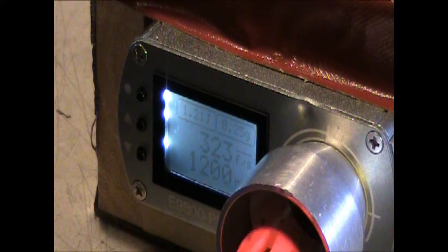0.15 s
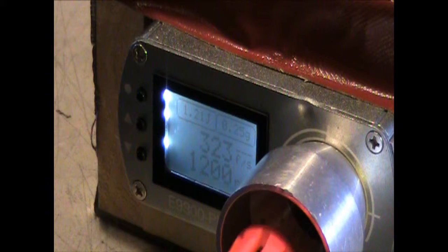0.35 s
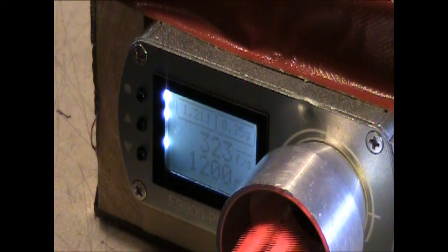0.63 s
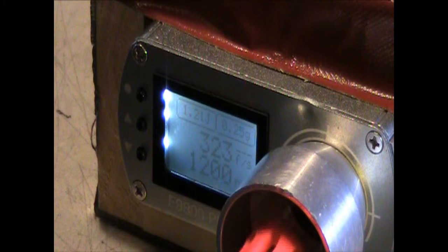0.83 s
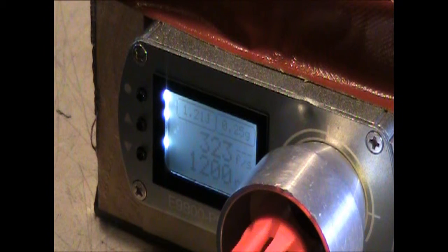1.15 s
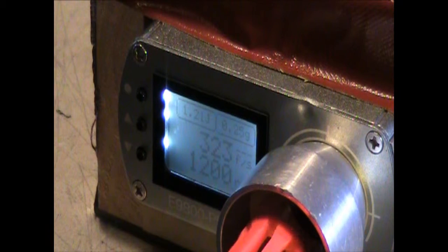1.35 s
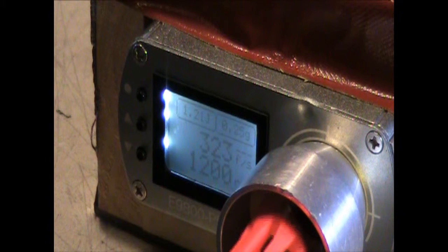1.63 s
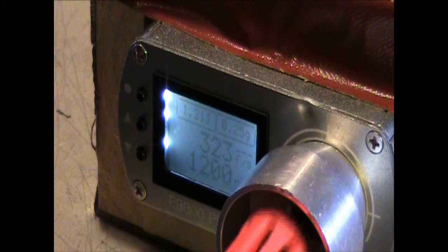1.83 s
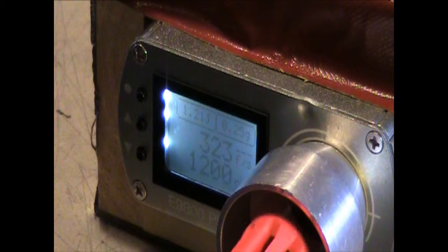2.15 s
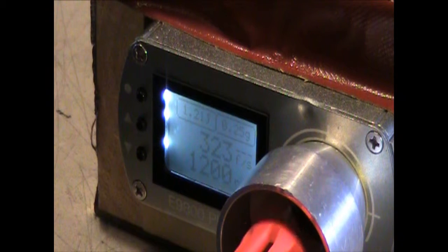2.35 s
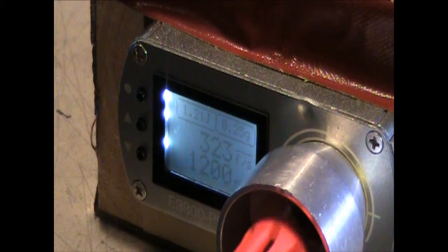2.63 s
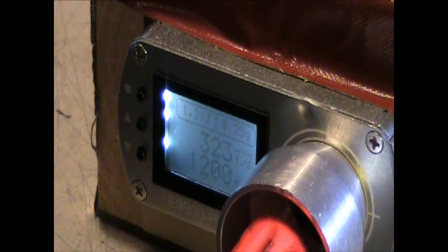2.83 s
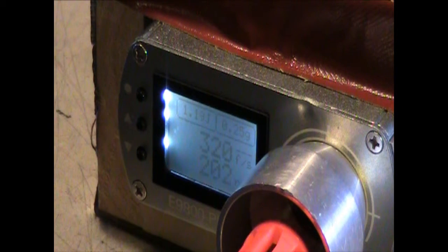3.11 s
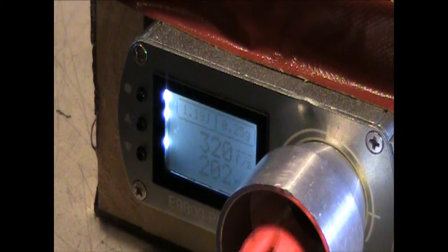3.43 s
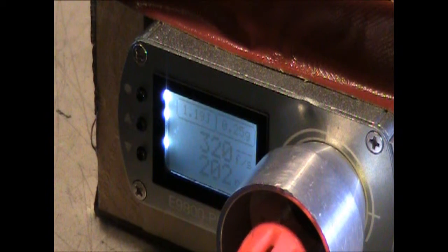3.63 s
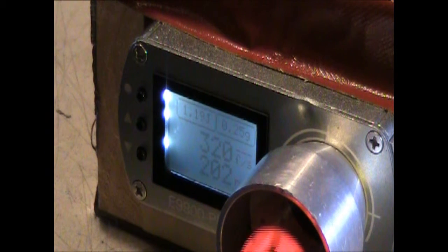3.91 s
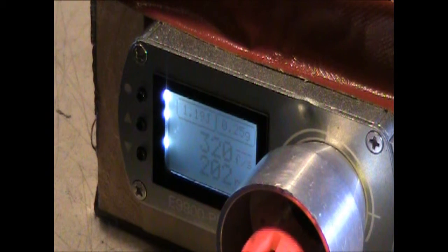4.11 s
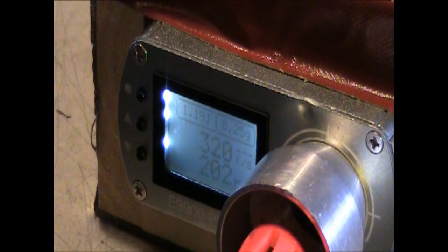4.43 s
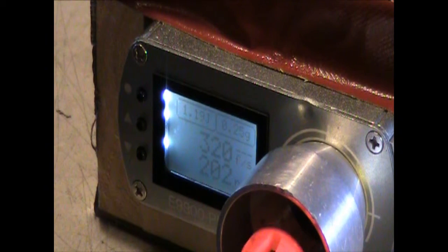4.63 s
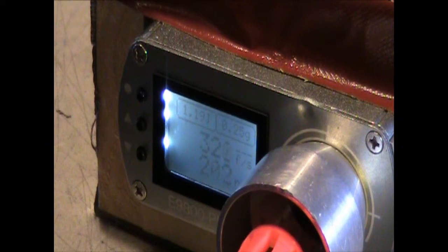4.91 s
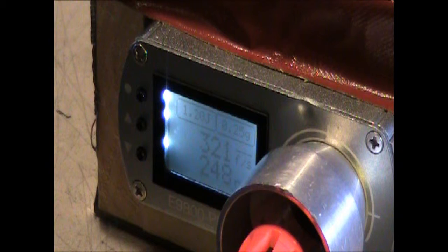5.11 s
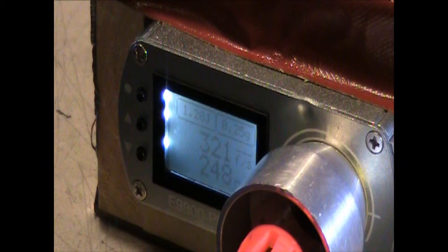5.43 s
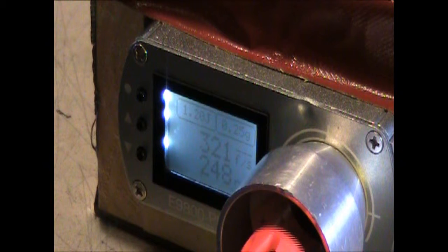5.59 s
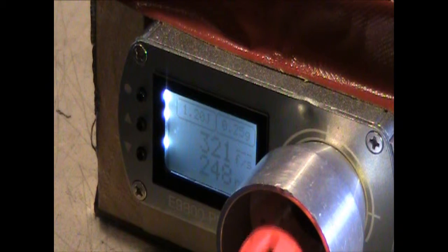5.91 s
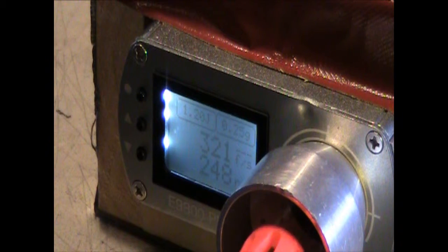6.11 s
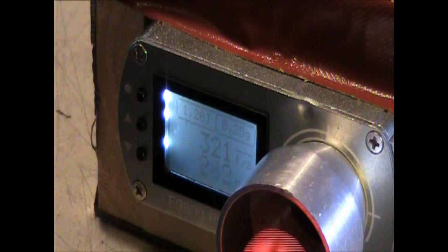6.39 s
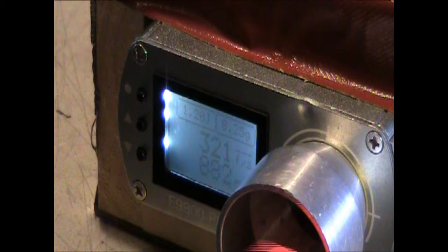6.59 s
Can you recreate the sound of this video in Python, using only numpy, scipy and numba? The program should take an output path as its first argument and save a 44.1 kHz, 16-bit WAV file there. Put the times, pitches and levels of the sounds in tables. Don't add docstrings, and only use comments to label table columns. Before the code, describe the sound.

A small room with faint low appliance hum and airy noise, heard through a close stereo camera microphone. An electric airsoft rifle fires into a metal tube on a bench. Each pull lasts about a tenth of a second: gears whine upward with gritty rattle, the piston cracks sharply, and the motor coasts down. A double slam comes at 0.2 seconds, a single at 0.7, a strong double at 1.1, then singles at 1.4, 1.7 and 2.0. Plastic knocks and trigger ticks lead to a double at 3.0, a faster, higher-whining double at 3.5 and a single at 4.0. A loud thin switch click follows near 4.2, then near quiet as the ducked hum recovers. A softer double comes at 5.4. Faint knocks, a dull hand tap and slight rubbing around 6.2 seconds precede a few last small clicks until about 6.7.

```python
import sys
import numpy as np
from scipy import signal
from scipy.io import wavfile
from scipy.ndimage import uniform_filter1d
from numba import njit

SR = 44100
rng = np.random.default_rng(int(sys.argv[2]) if len(sys.argv) > 2 else 0)


def boost_factor(decibels):
    exponent = np.asarray(decibels, float) / 20
    return 10 ** exponent


def to_wav(s):
    ch = np.atleast_2d(s).T
    pcm = np.round(np.clip(ch, -1, 1) * 32767)
    wavfile.write(sys.argv[1], SR, pcm.astype(np.int16))


N = 297675

# frequency in Hz, level in dB rms.
HUM_LINES = [(119.5, -78.5), (240, -70.5), (689, -84), (1357, -84), (2719, -90.5)]
# frequency in Hz, density in dB per Hz.
AIR_SPECTRUM = [(18, -61), (30, -29.5), (86, -23.5), (112, -9.5), (184, -29), (239, -2.5), (540, -13.5),
                (1390, -22), (1590, -21.5), (2750, -28), (3980, -31.5), (4420, -35), (16000, -45.5)]
# band centre in Hz, t60 in seconds, level in dB.
ROOM_BANDS = [(100, 0.17, -8), (300, 0.37, -14.5), (1170, 0.35, -8), (2800, 0.27, -8.5), (7000, 0.16, -9),
              (13100, 0.24, -13)]
# centre in seconds, length in seconds, level in dB.
RUSTLES = [
    (4.2, 0.041, -78),
    (6.32, 0.074, -73),
    (0.7, .02, -67),
]
# time in seconds, level in dB, frequency in Hz.
HAND_TAP = (6.261, -57, 750)
# time in seconds, peak in dB.
KNOCKS = [(.013, -64), (1.2014, -30), (1.3374, -32), (1.942, -41.5), (2.397, -42), (2.7414, -45),
          (2.9271, -40), (3.185, -35), (3.3523, -31.5), (3.3634, -45), (3.6974, -44), (3.8152, -41),
          (3.4575, -43), (4.444, -51.5), (5.2192, -59.5), (5.7347, -55), (6.2184, -57), (6.2578, -59),
          (6.5141, -47.5), (6.561, -57), (6.7246, -61)]
# time in seconds, peak in dB.
TICKS = [(.0471, -54.5), (.1821, -45), (.4475, -29.5), (.5732, -41), (.5849, -41.5), (1.3992, -43.5),
         (1.698, -48), (2.2567, -56), (2.4114, -47.5), (2.8708, -38.5), (2.8823, -40.5), (3.2397, -35),
         (3.4453, -37.5), (3.9409, -50.5), (3.9747, -48), (4.1802, -31), (6.2104, -58), (6.2744, -59),
         (1.39, -49.5)]
# time in seconds, peak in dB.
CONTACTS = [
    (.169, -52),
    (1.0072, -42.5),
    (1.0165, -41.5),
    (1.9763, -43),
    (2.7527, -49),
    (4.165, -22.5),
    (5.237, -50.5),
    (5.2492, -49.5),
    (6.2326, -54),
]
# time in seconds, peak in dB.
LATCHES = [
    (.4792, -39.5),
    (1.259, -25.5),
    (3.6675, -33.5),
]
# time in seconds, peak in dB, centre in Hz.
CATCHES = [
    (.2305, -24.5, 3910),
    (.7432, -16.5, 4000),
    (1.088, -12.5, 3970),
    (1.4631, -13, 4500),
    (3.0411, -26, 5500),
    (3.524, -16.5, 5070),
    (4.0196, -22.5, 4500),
    (4.0336, -24.5, 5560),
    (5.418, -27.5, 4200),
]
# start in seconds, spin-up in seconds, tooth rate under the spring load in Hz,
# motor cut in seconds.
PULLS = [
    (.215, .03, 2100, .297),
    (.725, .029, 2600, .806),
    (1.066, .036, 2300, 1.142),
    (1.444, .02, 2800, 1.51),
    (1.74, .032, 2300, 1.81),
    (2.022, .027, 2350, 2.1),
    (3.017, .028, 2350, 3.103),
    (3.486, .021, 3200, 3.587),
    (3.995, .022, 3120, 4.073),
    (5.389, .036, 2500, 5.468),
]
# rattle in dB, whine in dB above usual.
EFFORTS = [(-30.5, -0.55), (-26.5, -4), (-26, 1), (-24, -1), (-25, -3), (-25.5, -2.5), (-29, -0.5),
           (-27.5, 2), (-27, 5), (-31, 3)]
WHINE_DB = (-3, -0.5, -2.5, 3.5, -4, -9, -14)
# centre in Hz, width in Hz, level in dB.
GEARBOX = [(670, 330, -5.5), (2070, 890, -1.5), (3060, 620, 0.5), (4200, 1100, 0.5), (5590, 540, 1.5),
           (6050, 680, 1.5), (7750, 1300, -3.5), (14460, 3600, 0)]
# time in seconds, crack in dB, thump in dB, barrel pop in dB, meter tube ring in dB.
SLAMS = [(0.2728, -16, -42.5, -36, -80), (0.3427, -13.5, -41, -39, -68.5), (0.8012, -12, -37, -23.5, -64.5),
         (1.1161, -9, -35, -22.5, -75), (1.1938, -8.5, -37.5, -21.5, -69.5),
         (1.5194, -9.5, -30, -18, -76.5), (1.795, -6, -29.5, -16.5, -72), (2.0912, -8, -30.5, -18, -88.5),
         (3.0878, -14.5, -36.5, -23, -76), (3.1703, -9, -36.5, -20.5, -65.5), (3.571, -13, -39.5, -24, -61),
         (3.647, -10, -39, -20, -69), (4.0803, -12.5, -39.5, -21, -65), (5.4366, -17.5, -38, -26, -66.5),
         (5.5057, -14, -39, -26, -77)]
# centre in Hz, width in Hz, level in dB.
CYLINDER_HEAD = [(2160, 600, -3), (3200, 2400, -2), (4200, 2400, -4.5), (7000, 4100, -4),
                 (9360, 3900, -2.5), (14400, 1900, -9)]
# frequency in Hz, level in dB, t60 in seconds.
METER_TUBE = [(1088, -7, 1.9), (2223, -1, .75), (3300, -14, .8)]
# frequency in Hz, level in dB, t60 in seconds.
SPRING = [(4320, -89, 2.0), (5420, -89, 2.5), (6080, -85, 1.5), (6250, -86, 1.5), (6848, -83, 1.2)]


@njit
def svf(x, hz, width):
    y, b, l = np.empty(len(x)), 0., 0.
    g, k = np.tan(np.pi * hz / SR), width / hz
    for i in range(len(x)):
        v = (b + g * (x[i] - l)) / (1 + g * (g + k))
        b, l, y[i] = 2 * v - b, l + 2 * g * v, k * v
    return y


@njit
def follow(x, attack, release):
    y, e = np.empty(len(x)), 0.
    for i in range(len(x)):
        e += (x[i] - e) * (attack if x[i] < e else release)
        y[i] = e
    return y


def band(x, hz, width, times=1):
    for _ in range(times):
        x = svf(x, float(hz), float(width))
    return x


def body(x, modes):
    out = sum((-1) ** k * boost_factor(db) * band(x, hz, width) for k, (hz, width, db) in enumerate(modes))
    power = sum(boost_factor(db) ** 2 * np.pi * width / SR for _, width, db in modes)
    return out / np.sqrt(power)


def ringing(modes):
    t, out = np.arange(0, 2, 1 / SR), 0
    for hz, db, t60 in modes:
        pair = np.sin(2 * np.pi * hz * t) + 0.94 * np.sin(2 * np.pi * 1.004 * hz * t)
        out = out + boost_factor(db) * pair * boost_factor(-60 * t / t60)
    return out


def walk(rate):
    k = int(SR / rate)
    steps = np.repeat(rng.standard_normal(N // k + 1), k)
    return 1.4 * uniform_filter1d(uniform_filter1d(steps, k), k)[:N]


def swell(t, rise, fall):
    return np.exp(np.where(t < 0, t / rise, -t / fall))


def add(out, s, x):
    i = int(round(s * SR))
    out[i:i + len(x)] += x


def hum():
    air, slow, t = 0, walk(5.0), np.arange(N) / SR
    table_hz, table_db = np.transpose(AIR_SPECTRUM)
    for hz in 35 * 2 ** np.arange(0, 9, .5):
        mid, side = (band(rng.standard_normal(N), hz, hz / 2, 2) for _ in range(2))
        db = np.interp(np.log(hz), np.log(table_hz), table_db) + 0.97 * slow + 2.2 * walk(9)
        wide = np.clip(hz / 1700.0, .25, 1)
        air = air + boost_factor(db) * (mid + wide * side * np.array([[1], [-1]]))
    lines = 0
    for hz, db in HUM_LINES:
        wavering = np.sin(2 * np.pi * hz * t + 0.44 * walk(50))
        lines = lines + boost_factor(db + 4.5 + 0.83 * walk(14)) * wavering
    air_db = -64.5
    return air * boost_factor(air_db) / np.sqrt(np.mean(air ** 2)) + lines


def room(x):
    t, tail = np.arange(0, .45, 1 / SR), 0
    for hz, t60, db in ROOM_BANDS:
        mid, side = (band(rng.standard_normal(len(t)), hz, 2.0 * hz, 2) for _ in range(2))
        wide = np.clip(hz / 14000.0, .45, 1.3)
        decay = boost_factor(db - 60 * t / t60) / np.sqrt(t60 * SR / 14)
        tail = tail + decay * (mid + wide * side * np.array([[1], [-1]]))
    tail = tail * np.clip((t - .002) / 0.0024, 0, 1)
    return signal.fftconvolve(x[None], tail, axes=1)[:, :N]


def hand():
    t = np.arange(N) / SR
    rub = sum(boost_factor(db) * np.exp(-((t - s) / length) ** 2) for s, length, db in RUSTLES)
    grains = band(rng.standard_normal(N) * boost_factor(3.3 * walk(300)), 4200, 6000)
    s, db, hz = HAND_TAP
    tap = boost_factor(db) * np.sin(2 * np.pi * hz * (t - s)) * swell(t - s, .003, .011)
    return rub * grains + tap


def clicks(table, fall, extra_db):
    out, t = np.zeros(N), np.arange(-.002, .02, 1 / SR)
    for s, peak_db, hz in table:
        burst = rng.standard_normal(len(t)) * swell(t, 0.000067, fall)
        grip = boost_factor(2.0) * band(burst, 2000, 1500, 2)
        knock = band(burst, hz, 1.2 * hz, 3) + grip
        add(out, s + t[0], boost_factor(peak_db + extra_db) * knock / np.abs(knock).max())
    return out


def handling_ticks():
    kinds = (KNOCKS, 3270), (TICKS, 4400), (CONTACTS, 5500), (LATCHES, 7600)
    rows = sorted((s, db, hz) for table, hz in kinds for s, db in table)
    return clicks(rows, .001, 1.5)


def motor(s, spin_s, loaded_hz, cut_s):
    start_hz, free_hz, stop_hz, freed_s = 400, 3400, 400, .011
    coast, rewind, eased = 24000, 38000, 14000
    bite_s, dip_lead_s, run_out_s, brake_s = 0.013, .014, 0.062, 0.0077
    slams = [slam[0] for slam in SLAMS if s < slam[0] < s + .2]
    first, last, twice = slams[0], slams[-1], len(slams) > 1
    t = np.arange(s, last + run_out_s, 1 / SR)
    powered = np.minimum(t, cut_s)
    hz = loaded_hz - (loaded_hz - start_hz) * np.exp(-((powered - s) / spin_s) ** 1.5)
    if twice:
        hz = free_hz - (free_hz - hz) * np.exp(-np.maximum(powered - first, 0) / freed_s)
        hz = hz - rewind * np.clip(t - cut_s, 0, last - cut_s) - eased * np.maximum(t - last, 0)
    else:
        hz = hz - coast * np.maximum(t - cut_s, 0)
    brake = t[-1] - brake_s
    cut = max(cut_s, first + .005)
    dip = last - dip_lead_s if twice else t[-1] - 1.5 * brake_s
    return t, np.maximum(hz, stop_hz), [s, s + bite_s, first, cut, dip, brake, t[-1]]


def gears():
    out = np.zeros(N)
    for (start, spin_s, loaded_hz, cut_s), (effort_db, sing_db) in zip(PULLS, EFFORTS):
        t, hz, moments = motor(start, spin_s, loaded_hz, cut_s)
        hz = uniform_filter1d(hz, size=400, mode="nearest")
        shape_db = effort_db + np.array([-450 * spin_s, 0, -4.5, -6, -11, -13, -25])
        sing = sing_db * (np.array(moments) <= moments[2]) + WHINE_DB
        rattle_db = uniform_filter1d(np.interp(t, moments, shape_db), size=180)
        whine_db = uniform_filter1d(np.interp(t, moments, sing), size=180)
        jitter, patches, grit, play = rng.standard_normal((4, len(t)))
        phase = 2 * np.pi * np.cumsum(hz * (1 + .25 * uniform_filter1d(jitter, size=100))) / SR
        gate = (1 + 0.97 * np.cos(phase)) * (1 + 0.13 * np.cos(phase / 9))
        patchy = boost_factor(19 * uniform_filter1d(patches, size=60))
        whine = np.sin(phase) + boost_factor(-11) * np.sin(2 * phase)
        whine = whine * boost_factor(np.clip(np.gradient(hz) * 8, -6, 0))
        slack = boost_factor(40 * uniform_filter1d(play, size=160))
        mesh = gate * grit + boost_factor(whine_db - 4) * slack * whine
        onset = np.clip((t - start) / 0.0068, 0, 1)
        add(out, start, boost_factor(rattle_db) * onset * patchy * mesh)
    shell = signal.butter(3, [560, 11000], "band", fs=SR, output="sos")
    return signal.sosfilt(shell, body(out, GEARBOX))


def shots():
    slam, air, strike, jet, body_noise = np.zeros((5, N))
    t = np.arange(-.015, .25, 1 / SR)
    for s, crack_db, thump_db, pop_db, ring_db in SLAMS:
        impact, draught, wood, shell = rng.standard_normal((4, len(t)))
        detune = 1 + .04 * rng.standard_normal(4)
        at, crack = s + t[0], boost_factor(crack_db)
        scraping = (t > -.0095) * (t < 0)
        slide = boost_factor(-28.5) * scraping * (1 + 0.81 * swell(t + 0.0042, 0.00088, .0015))
        bounce = boost_factor(-19) * swell(t - .005, 0.0003, 0.0012)
        blow = swell(t - 7e-4, 0.0011, 0.0005)
        add(slam, at, boost_factor(crack_db + 3) * impact * (blow + slide + bounce))
        whistles = zip((4500, 3820, 3170, 2200), (-8.5, -8, -8.5, -13.5), detune)
        squeeze = sum(boost_factor(db) * np.sin(2 * np.pi * hz * d * t) for hz, db, d in whistles)
        add(jet, at, crack * squeeze * np.exp(-(t / .0011) ** 2))
        add(body_noise, at, boost_factor(crack_db - 8.5) * shell * swell(t, .002, 0.0092))
        thump = np.cos(2 * np.pi * 110 * (t + 0.0048)) * swell(t + 0.0035, 0.00033, 0.0038)
        boards = boost_factor(-14) * np.sin(2 * np.pi * 250 * t) + boost_factor(8) * band(wood, 380, 290)
        bench = boards * swell(t - .005, .006, 0.029)
        pop = np.sin(2 * np.pi * 760 * t) * swell(t - .0025, 0.0018, 0.00081)
        rush = boost_factor(-16.5) * band(draught, 980, 930) * swell(t + 0.0028, 0.0065, 0.0039)
        add(air, at, boost_factor(thump_db) * (thump + bench) + boost_factor(pop_db) * pop + rush)
        strike[int(s * SR)] = boost_factor(ring_db)
    tube = signal.fftconvolve(strike, ringing(METER_TUBE))[:N]
    spring = signal.fftconvolve(1. * (strike > 0), ringing(SPRING))[:N] * boost_factor(4.9 * walk(31))
    near = body(slam, CYLINDER_HEAD) + jet + air + tube + spring
    return near, body(body_noise, CYLINDER_HEAD) + air


def scene():
    front, around = boost_factor(5.0) * np.array(shots())
    rest = boost_factor(6.5) * (gears() + clicks(CATCHES, .0008, -2.3)) + hand()
    ticks = handling_ticks()
    near = front + rest + ticks
    t = np.arange(0, .012, 1 / SR)
    splinters = boost_factor(-23.5) * band(rng.standard_normal(len(t)), 7000, 9000) * np.exp(-t / 0.001)
    scatter = signal.fftconvolve(near, splinters)[:N]
    direct = np.array([near + scatter, np.roll(near, shift=1) - scatter])
    both = direct + room(around + rest + boost_factor(0.5) * ticks) + hum()
    bass = signal.sosfilt(signal.butter(1, 700, fs=SR, output="sos"), both)
    return both + bass * np.array([[-.12], [.12]])


def low_pass(x):
    return signal.sosfilt(signal.butter(12, 16650, fs=SR, output="sos"), x)


def record(dry):
    dry = signal.sosfilt(signal.butter(1, 50, "high", fs=SR, output="sos"), dry)
    power = uniform_filter1d(np.mean(dry ** 2, axis=0), size=400)
    loud_db = 10 * np.log10(power.clip(1e-12))
    gain_db = follow(-.9 * np.maximum(loud_db + 39.5, 0), 1 / (.1 * SR), 1 / (.25 * SR))
    gain_db = follow(gain_db, 1 / (0.057 * SR), 1 / (.2 * SR))
    ceiling = .23
    rounded = ceiling * np.tanh(dry * boost_factor(gain_db) / ceiling)
    top = signal.ellip(8, .2, 60, 16550, fs=SR, output="sos")
    return low_pass(signal.sosfilt(top, rounded))


dry = scene()
out = record(dry)
to_wav(out)
```